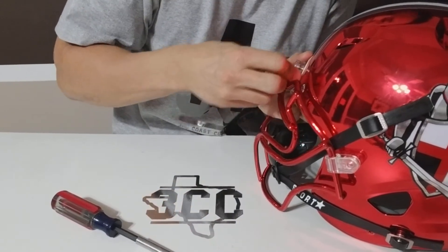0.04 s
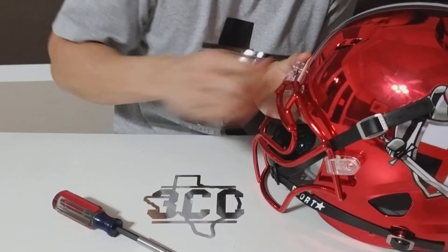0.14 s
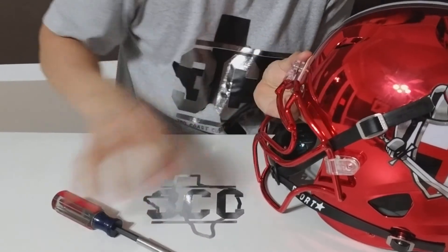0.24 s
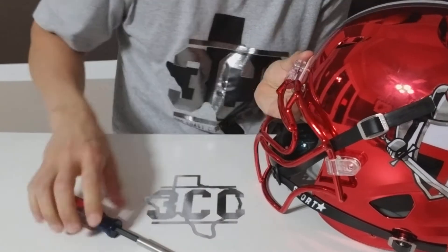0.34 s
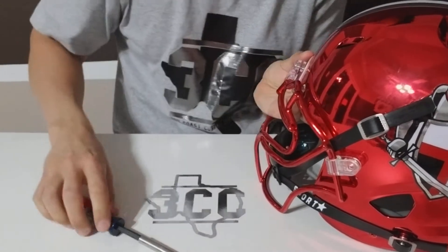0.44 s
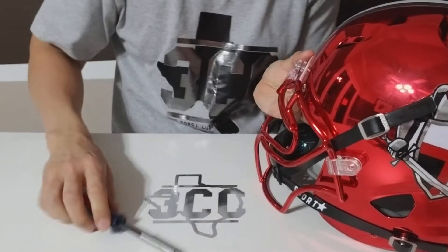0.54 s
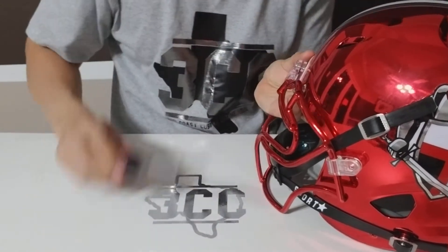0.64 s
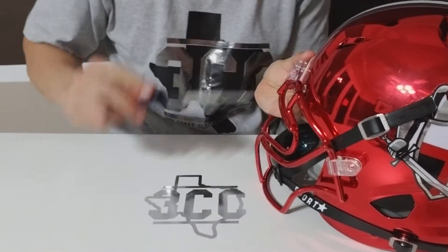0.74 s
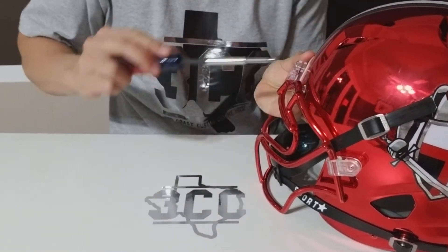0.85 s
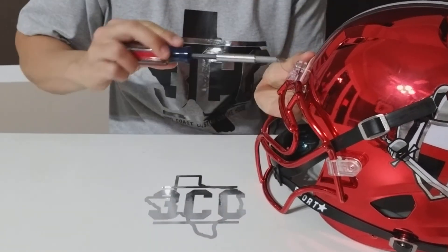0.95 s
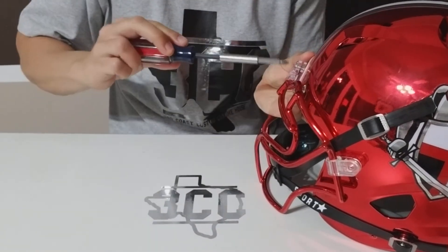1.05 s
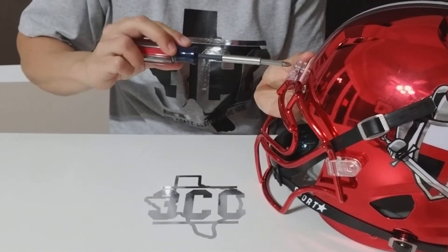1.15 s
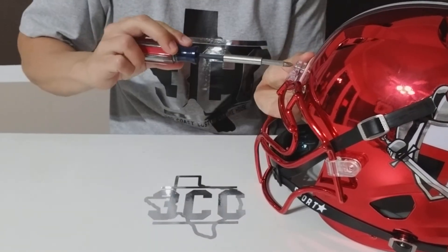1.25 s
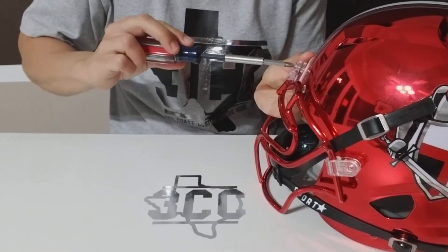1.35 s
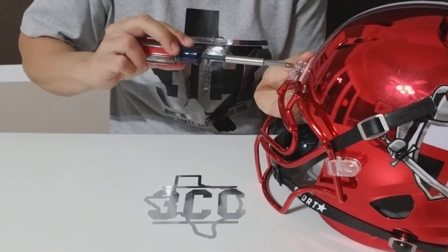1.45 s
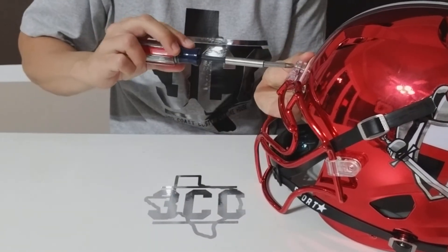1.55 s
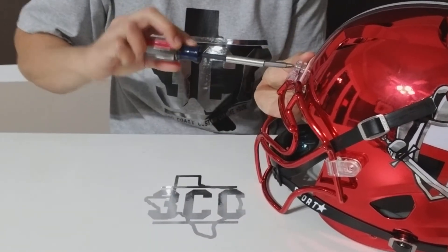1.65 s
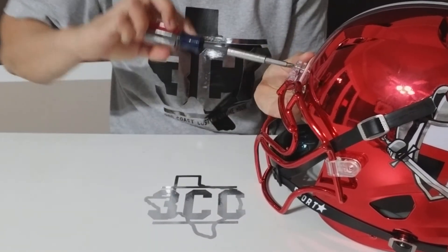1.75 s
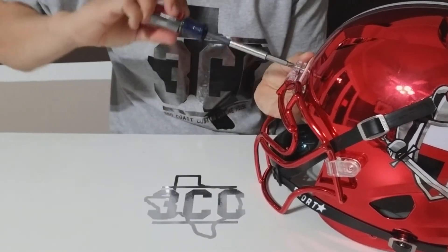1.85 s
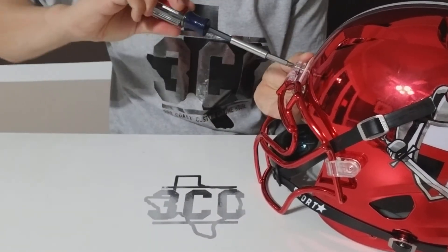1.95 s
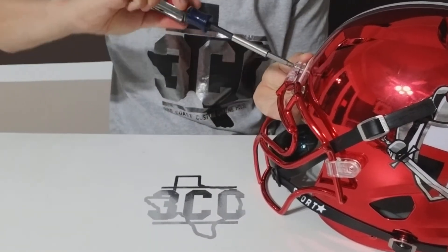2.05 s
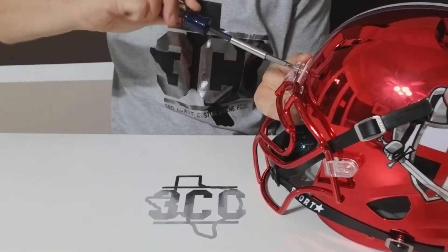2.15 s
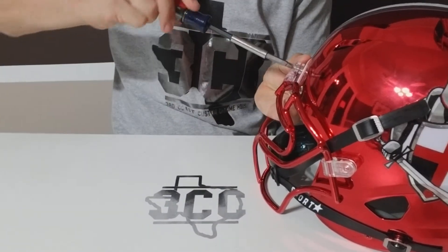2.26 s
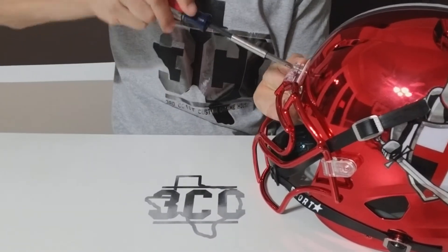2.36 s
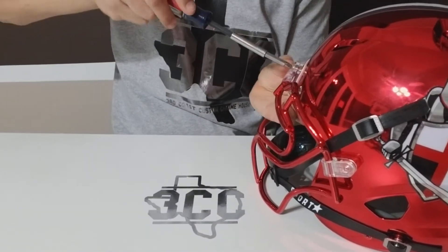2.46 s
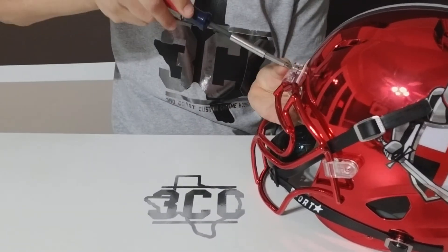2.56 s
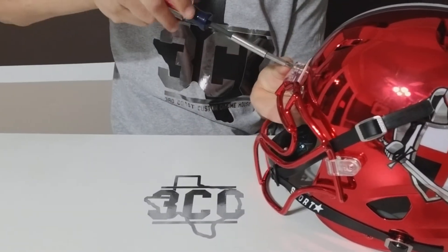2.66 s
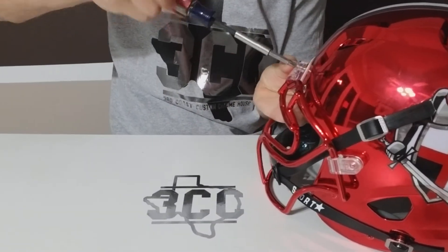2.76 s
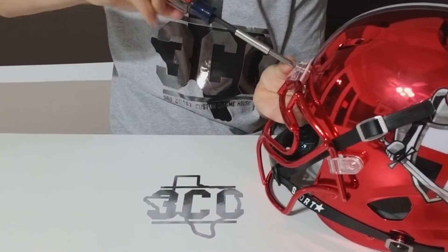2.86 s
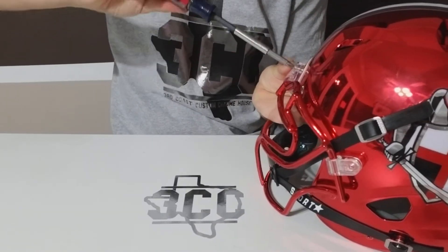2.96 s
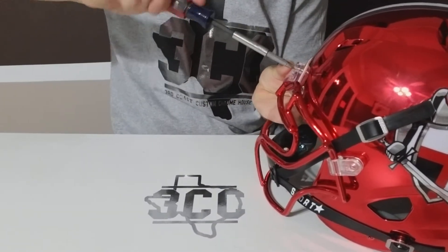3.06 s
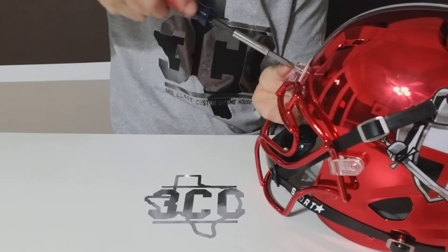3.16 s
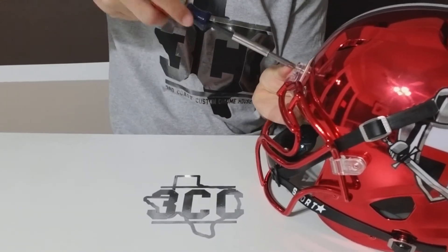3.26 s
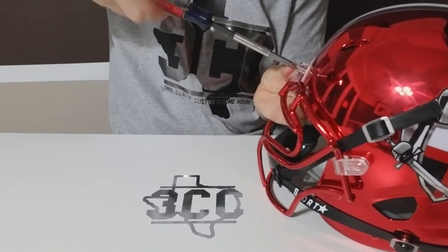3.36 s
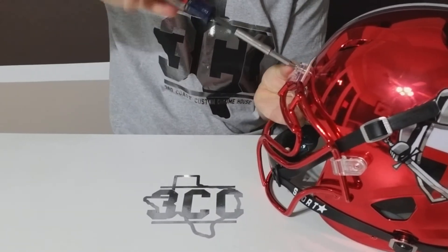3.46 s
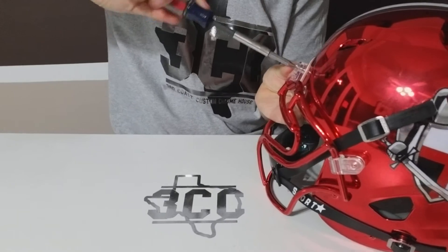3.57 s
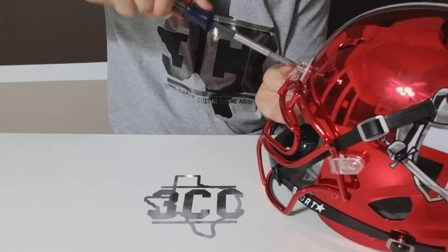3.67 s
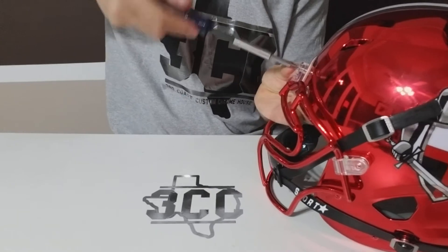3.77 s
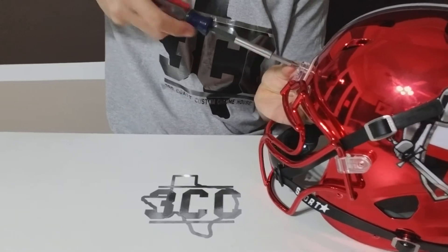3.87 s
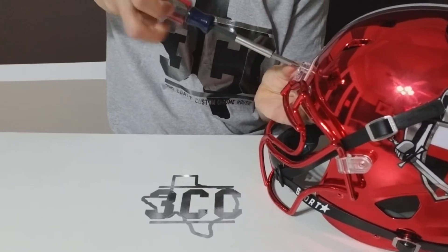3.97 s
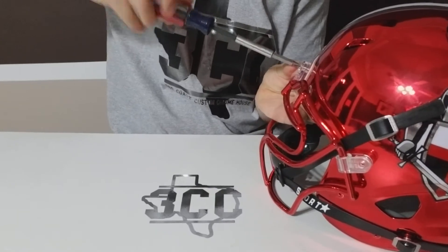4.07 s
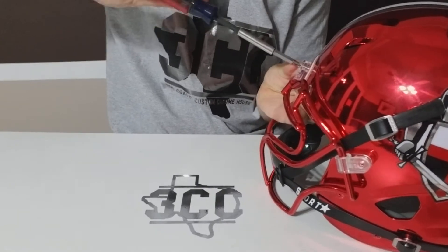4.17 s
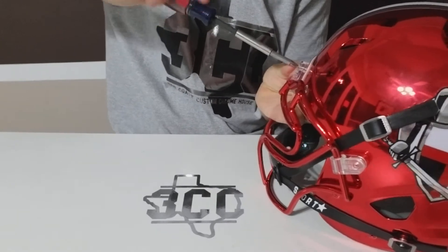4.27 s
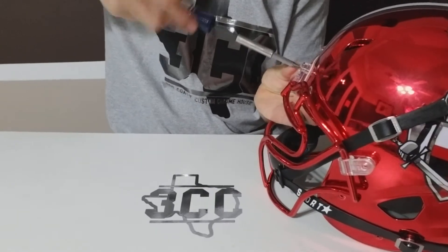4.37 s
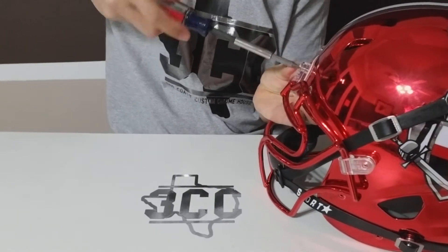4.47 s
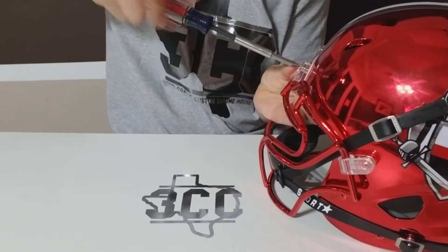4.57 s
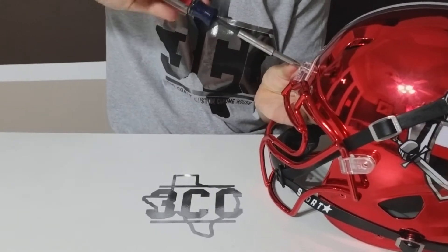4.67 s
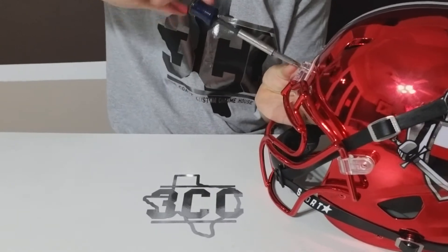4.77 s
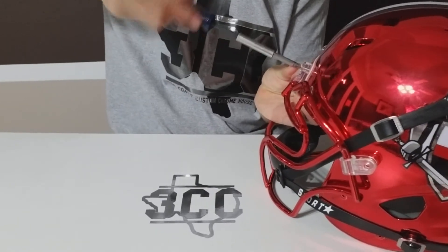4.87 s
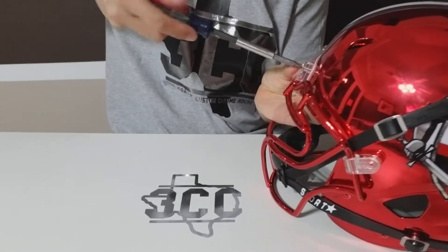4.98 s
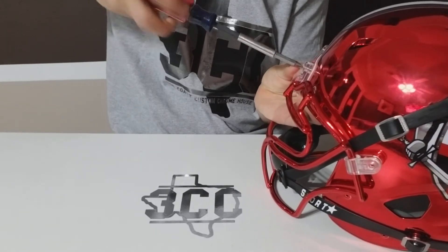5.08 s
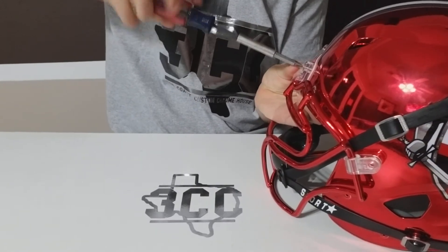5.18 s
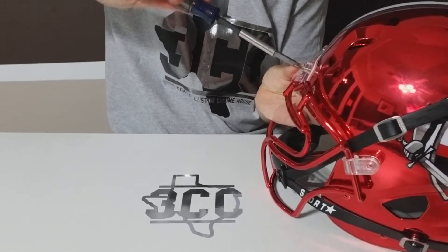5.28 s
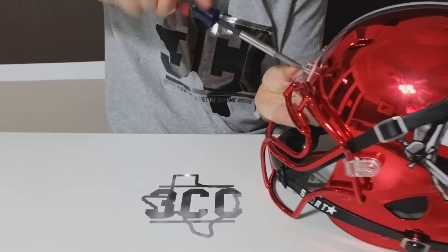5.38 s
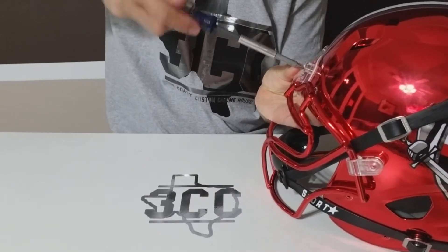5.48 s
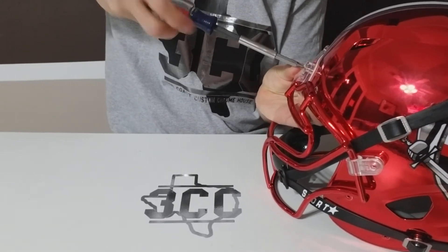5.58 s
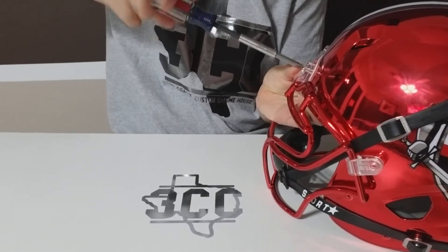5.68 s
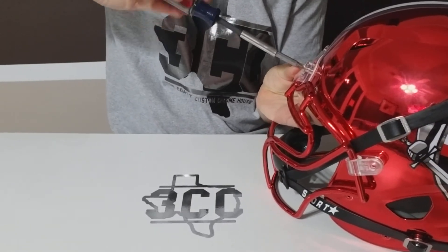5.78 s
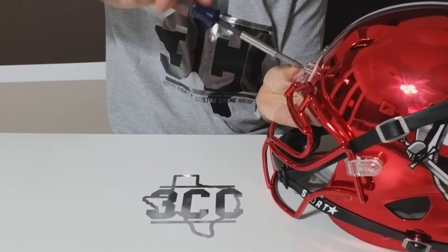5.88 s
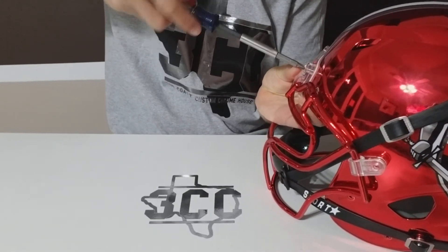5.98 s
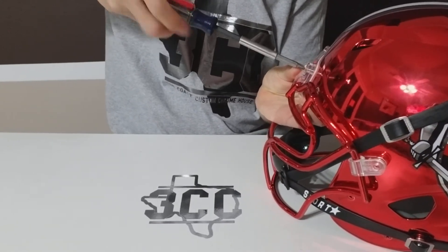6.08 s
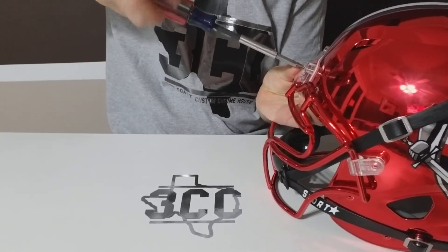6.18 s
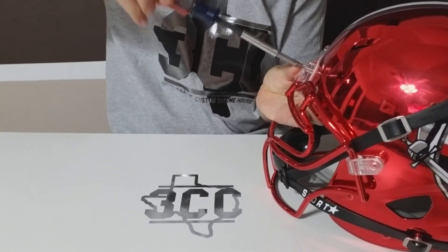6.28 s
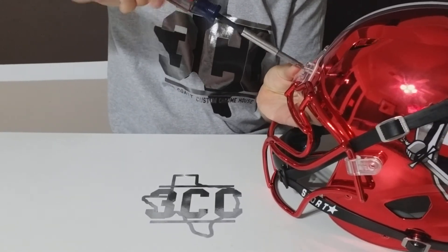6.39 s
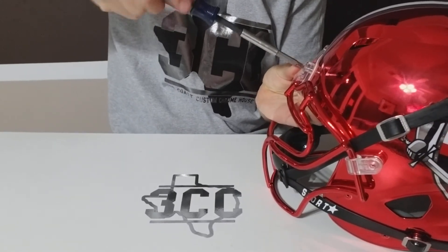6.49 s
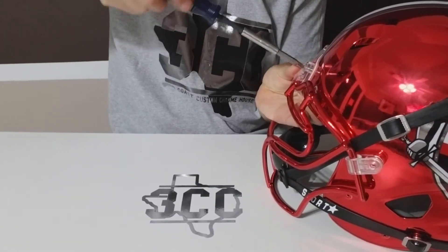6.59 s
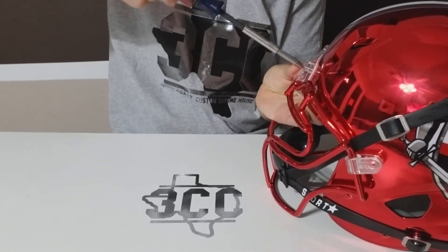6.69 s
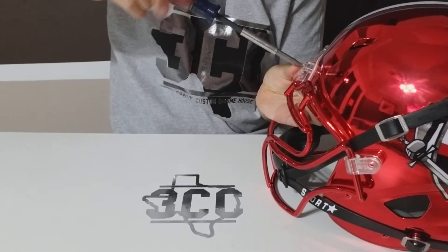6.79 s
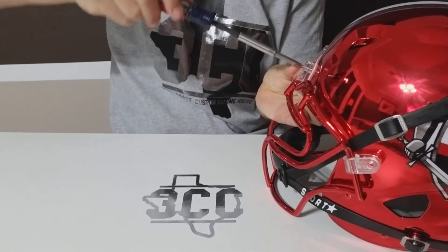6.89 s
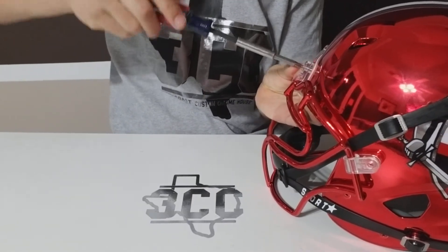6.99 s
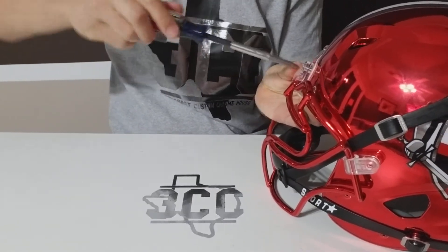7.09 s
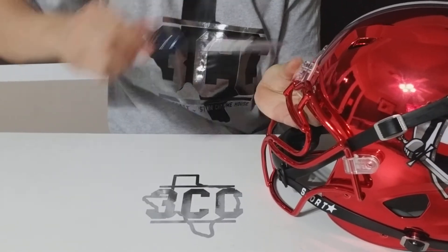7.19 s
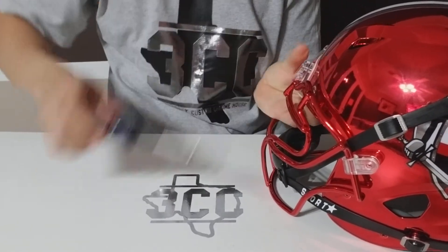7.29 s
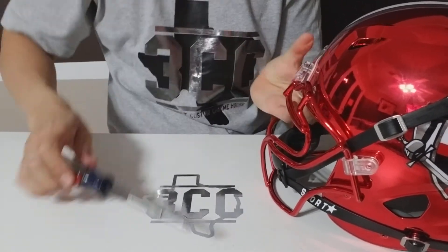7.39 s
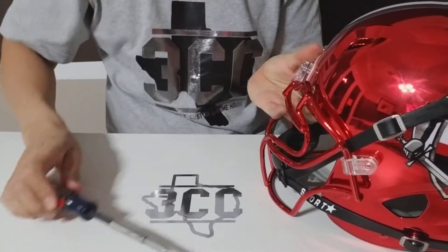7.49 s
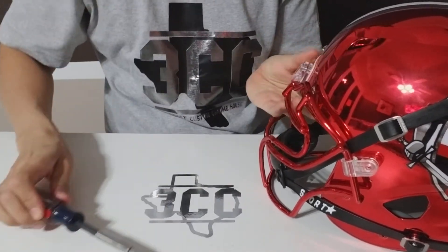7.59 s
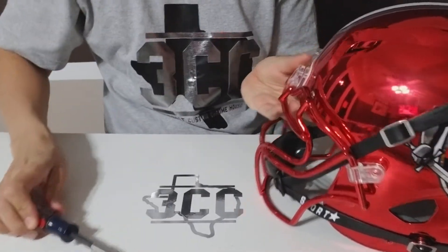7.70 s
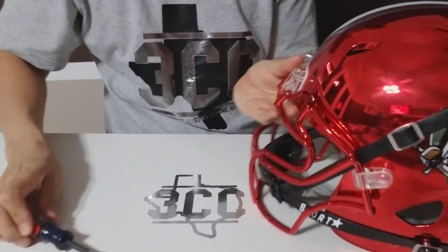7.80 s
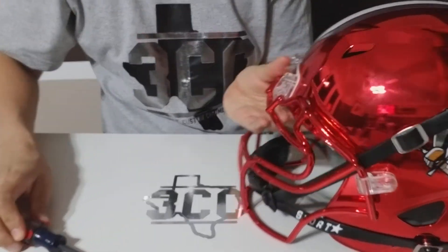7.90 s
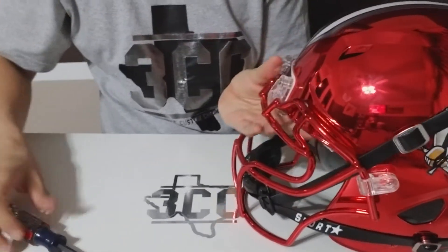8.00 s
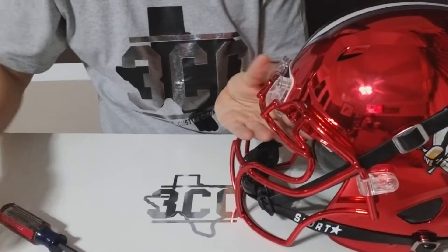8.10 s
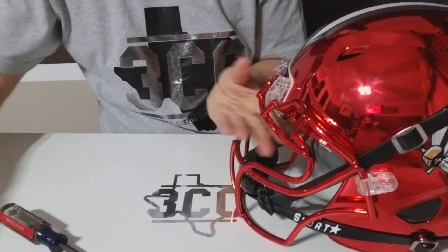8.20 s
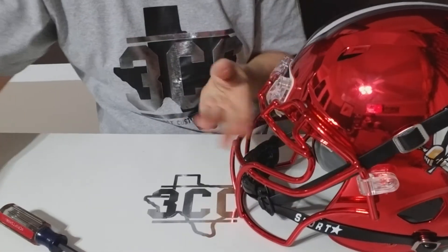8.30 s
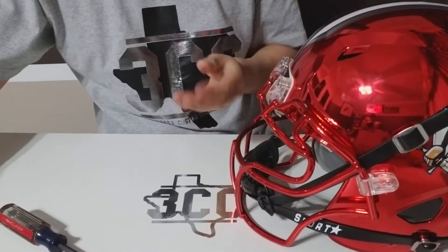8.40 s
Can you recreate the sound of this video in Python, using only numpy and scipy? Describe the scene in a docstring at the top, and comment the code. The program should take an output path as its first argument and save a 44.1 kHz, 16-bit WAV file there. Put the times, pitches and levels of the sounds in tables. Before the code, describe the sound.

Faint scrapes, sharp little snaps and dull helmet knocks come as a screw is turned by hand, before the screwdriver clunks loudly onto a table.

```python
"""First come dull knocks on a hand-held helmet, then a thud and a clack as a screwdriver is picked up.
It turns a screw through a plastic clip on the helmet: at each twist the thread scrapes, the tip snaps
in the screw head and the hollow shell knocks. The loose handle ticks as the tool is moved about.
At the end the tool clatters back onto the table and the plastic gives a short creak.
Two microphones, a hand's length apart, hear it all in a small room with hard walls."""
import sys
import numpy as np
from scipy import signal
from scipy.fft import rfft, irfft, next_fast_len
from scipy.io import wavfile
from scipy.ndimage import uniform_filter1d

SR = 44100
rng = np.random.default_rng(int(sys.argv[2]) if len(sys.argv) > 2 else 0)


def put_to_file(sound):
    """Save the sound as 16-bit audio at rate SR, in the file named by the first command-line argument."""
    columns = np.atleast_2d(sound).T  # one column per channel
    safe = np.clip(columns, -1, 1)
    whole_steps = np.round(safe * 32767)
    wavfile.write(sys.argv[1], SR, whole_steps.astype(np.int16))


N = 372644
TIME = np.arange(N) / SR
HIT = TIME[:2 ** 15]  # the clock for one hit, in seconds


# Twists of the wrist: start t/s, hardest t/s, let-go t/s, rise in effort/dB,
# scrape level/dB, scrape f/Hz, creak level/dB, shell rocking level/dB
TWISTS = [(1.965, 2.05, 2.6, 2.5, -62, 8800, -60.5, -53.5),
          (2.839, 3.029, 3.26, 14.5, -59.5, 10000, -60.5, -49),
          (3.2, 3.408, 3.36, 15.5, -71, 10100, -84, -49.5),
          (3.538, 3.653, 3.864, 24.5, -53.5, 11100, -50.5, -41),
          (4.105, 4.282, 4.57, 11.5, -63, 11000, -70, -43),
          (4.641, 4.788, 5.1, 18.5, -58.5, 12000, -56, -41),
          (5.167, 5.364, 6.03, 5, -67.5, 10100, -67, -59), (5.691, 5.72, 5.86, 24, -59, 13100, -61, -44.5),
          (5.776, 5.853, 6.06, 14.5, -54, 12100, -51.5, -44.5),
          (6.197, 6.212, 6.57, -23, -72.5, 7440, -63, -56),
          (6.29, 6.373, 6.42, -2.5, -70.5, 10200, -68, -48),
          (6.624, 6.725, 6.76, 14.5, -55.5, 13000, -57.5, -51)]
# Tone of the scraping thread: f/Hz, level/dB
SCRAPE_COLOUR = [(2500, 7), (4500, 8.5), (8000, 10.5), (8700, 15), (9400, -11), (10300, 5), (11500, 7.5),
                 (13000, 8.5), (14700, 10), (15700, -29)]
# Tone of the plastic clip: f/Hz, level/dB
CLIP_COLOUR = [(300, -11.5), (700, -30), (1100, -15), (1800, -6), (2200, -4), (2450, 0), (2850, -9.5),
               (3700, -8.5), (4800, -15), (8000, -42)]

def thread_scrape():
    """The thread catches and slips: it scrapes at a pitch set for each twist and creaks in the plastic."""
    catching = judder(rate=160, depth_db=4)
    scrape = colour(catching * slips(rate=1300, spread_db=-3), SCRAPE_COLOUR)
    creak = level(colour(catching * slips(rate=230, spread_db=5), CLIP_COLOUR), 0)

    def scrape_at(hz, width_hz=5300):
        return level(signal.lfilter(*signal.iirpeak(hz, hz / width_hz, fs=SR), scrape), 0)

    track = np.zeros(N)
    for twist in TWISTS:
        start, _, end, _, scrape_db, centre_hz, creak_db, _ = twist
        friction = undb(scrape_db) * scrape_at(centre_hz) + undb(creak_db) * creak
        track += during(start, end) * undb(effort(TIME, twist)) * friction
    start, end = 8.352, 8.4  # the plastic creaks as the helmet is shifted
    add(track, start, stroke(scrape_at(5500), start, end, db=-60) + stroke(creak, start, end, db=-49))
    return track


def effort(t, twist, swell_shape=.49, release_db=60):
    """Effort of a twist in dB: it builds (late, if the shape is below 1), then falls as the hand lets go."""
    start, hardest, end, swell_db = twist[:4]
    to_go = np.interp(t, [start, hardest], [1, 0])
    released = np.interp(t, [hardest, end], [0, 1])
    return -swell_db * to_go ** swell_shape - release_db * released


# The tip jumps in the screw head: t/s, snap level/dB, clip level/dB, snap's low edge f/Hz
SNAPS = [(1.9666, -29.5, -46.5, 12000), (2.016, -52, -48, 9000), (2.0288, -31.5, -40.5, 3000),
         (2.045, -41, -37, 2000), (2.3165, -46.5, -58, 2000), (2.7621, -50, -61, 4000),
         (2.809, -43.5, -46, 2000), (2.927, -60, -52, 2000), (2.9648, -42.5, -55, 8000),
         (3.0632, -53, -66, 5860), (3.0786, -32, -51, 7700), (3.3952, -48.5, -58, 3980),
         (3.616, -37.5, -54, 9000), (3.647, -31.5, -37.5, 2930), (3.6632, -41, -41, 2000),
         (3.8038, -48, -70, 6900), (4.232, -45.5, -53, 3000), (4.2712, -35, -47.5, 6100),
         (4.291, -32.5, -49.5, 6100), (4.298, -43, -55, 7100), (4.34, -38.5, -68, 8000),
         (4.765, -39, -38, 6000), (4.7725, -28, -43.5, 2000), (4.787, -39, -44, 1990),
         (4.829, -46, -56, 3000), (5.3311, -46, -53.5, 4000), (5.3446, -35, -46, 6100),
         (5.3667, -40, -50, 5130), (5.4196, -39.5, -75, 7000), (5.8555, -29.5, -36.5, 4200),
         (5.9628, -41.5, -53, 3020), (6.3964, -41, -71, 5950), (6.424, -44, -54, 6000),
         (6.63, -48, -63, 7750), (6.684, -41, -43, 2980), (6.7243, -29, -53, 10800)]
# Tone of a snap: f/Hz, level/dB
SNAP_COLOUR = [(1500, -13), (3500, -1), (5000, 4), (7200, -1), (8700, 2), (10200, -2.5), (13000, 4.5),
               (14600, -6), (15700, 3.5)]
CLIP_NOTES = [(2350, -3, .07), (2440, 0, .1), (2510, -4, .06), (3790, -10, .04)]

def tip_snaps():
    """Steel slips on steel with a bright snap, and the plastic clip answers lower down."""
    snaps = list(SNAPS)
    for twist in TWISTS:  # extra small snaps follow the effort
        start, hardest, end, _, scrape_db, _, creak_db, _ = twist
        times = moments((start + hardest) / 2, (hardest + end) / 2, count=7)
        sizes_db = effort(times, twist) + 6 + 5 * rng.standard_normal(len(times))
        snaps += [(t, scrape_db + db, creak_db + db, 6500) for t, db in zip(times, sizes_db)]
    times, snap_db, clip_db, edges_hz = np.transpose(snaps)
    track = cracks(times, snap_db, SNAP_COLOUR, t60=.012, rise_s=.00037, edges_hz=edges_hz)
    track += cracks(times, clip_db, CLIP_COLOUR, t60=.021, rise_s=.0029)
    for start, db in zip(times, clip_db):
        add(track, start, peak(ring(CLIP_NOTES, scatter_db=2), db - 10))
    return track


# The shell knocks on hand and table: t/s, boom level/dB, boom f/Hz, hollow level/dB, rattle level/dB
KNOCKS = [(0.01, -38.5, 290, -45, -57), (.047, -38.5, 89, -71, -75), (0.089, -40, 312, -61, -76),
          (0.171, -37, 194, -50, -79.5), (1.321, -46.5, 176, -61.5, -61), (1.439, -50, 119, -62.5, -69),
          (1.609, -40, 184, -71, -57), (1.695, -42, 181, -64, -61.5), (2.091, -39.5, 85, -53, -88),
          (2.313, -50, 352, -51, -50), (2.525, -43.5, 248, -81, -91), (2.734, -37, 186, -63, -67.5),
          (2.77, -29.5, 290, -38.5, -69), (2.784, -35, 78.4, -41.5, -57), (3.201, -39.5, 88, -52, -60),
          (3.468, -41.5, 193, -60, -62), (3.522, -40, 186, -57, -52.5), (3.648, -35.5, 100, -49, -60),
          (3.684, -43, 110, -47.5, -54), (3.776, -33.5, 100, -43, -55.5), (4.164, -36.5, 260, -52, -80),
          (4.331, -36, 192, -58, -79), (4.404, -42, 201, -57.5, -60.5), (4.55, -54, 80, -81, -63),
          (4.682, -38, 82, -66, -58.5), (4.774, -41, 176, -45.5, -46.5), (4.918, -42, 131, -51.5, -61),
          (5.17, -36, 191, -58, -46.5), (5.309, -31, 200, -43, -47.5), (5.479, -42, 182, -71, -56.5),
          (5.682, -37.5, 208, -68, -51), (5.861, -36, 180, -48, -44.5), (6.075, -38.5, 180, -75, -77),
          (6.197, -30.5, 214, -42.5, -42), (6.511, -41.5, 172, -54, -54.5),
          (6.678, -29.5, 224.5, -39.5, -44.5), (6.896, -47, 191, -78, -50.5), (6.966, -38, 302, -59, -46),
          (7.341, -41, 188.4, -51, -84), (8.213, -47.5, 108, -89, -91), (8.379, -61, 202, -59.5, -46)]
# Notes the shell rings with: f/Hz, level/dB, ring time/s
SHELL_NOTES = [(75, -4.5, .15), (87, -4.5, 0.18), (102.7, 0.5, .12), (172, -3, 0.11), (196.6, 1.5, 0.055),
               (262, -1.5, 0.073), (308.7, 6, 0.033), (352, -6.5, 0.035), (440, -6, 0.079)]
# Tones of the hollow shell, of loose parts rattling and of a rubbing hand: f/Hz, level/dB
HOLLOW_COLOUR = [(40, -47.5), (150, -36), (330, -2), (470, 3.5), (560, -7.5), (700, -7.5), (800, -7),
                 (1000, -13.5), (1300, -29.5), (3000, -39), (9000, -59.5)]
RATTLE_COLOUR = [(300, -22), (600, 7), (1000, 7.5), (1250, 5), (1600, 8), (2100, 2.5), (2700, -2.5),
                 (3400, -13.5), (5500, -31), (12000, -43)]
GRIP_COLOUR = [(30, -42.5), (65, -2), (110, 2), (145, -1), (190, -1.5), (260, -3.5), (330, -1),
               (450, -17.5), (600, -24), (1000, -22), (2000, -30), (5000, -38.5)]

def helmet_knocks():
    """Each knock makes the hollow shell boom and shakes its fittings; the hand rubs in between."""
    bumps, rub_gain = rocking()
    knocks = KNOCKS + bumps
    times, _, _, hollow_db, rattle_db = np.transpose(knocks)
    track = cracks(times, hollow_db, HOLLOW_COLOUR, t60=.055, rise_s=.00086)
    track += cracks(times, rattle_db, RATTLE_COLOUR, t60=.051, rise_s=.003)
    cushion = (1 - np.exp(-HIT / .0024)) * fade(.25)  # the hand softens and damps each blow
    for start, boom_db, centre_hz, _, _ in knocks:
        boom = ring(SHELL_NOTES, scatter_db=2.5, centre_hz=centre_hz, octaves=.95)
        add(track, start, peak(cushion * boom, boom_db))
    rub = level(colour(slips(rate=250, spread_db=2), GRIP_COLOUR), 0)
    return track + rub_gain * rub


def rocking(effort_share=.49, bump_hz=100):
    """Twists rock the helmet: gives small bumps (rows like KNOCKS) and the volume of the hand's rub."""
    bumps = []
    rub_gain = undb(-66.5) * during(1.3, 7.45)  # the hand rests on the shell
    for twist in TWISTS:
        start, _, end, *_, shell_db = twist
        times = moments(start, end, count=5)
        size, pitch = rng.standard_normal((2, len(times)))
        db = shell_db + effort_share * effort(times, twist) + 4 + 2.5 * size
        bumps += zip(times, db, bump_hz * 2 ** (pitch / 2), db - 9.5, db - 18)
        rub_gain += during(start, end) * undb(shell_db + effort_share * effort(TIME, twist) - 7)
    return bumps, rub_gain


# Hard clacks on the table: t/s, crack level/dB, ring level/dB, first bounce level/dB
CLACKS = [(.501, -29.5, -65.5, -63), (7.678, -14, -27, -23.5), (7.687, -13.5, -26, -25.5),
          (7.711, -21, -27, -28), (7.838, -31.5, -42, -64)]
# Tone of a clack: f/Hz, level/dB
CLACK_COLOUR = [(200, -29), (550, -2.5), (900, -1), (1500, 4.5), (2200, 5), (3300, 0), (4000, -2),
                (4700, -14.5), (5800, -22.5), (7400, -23.5), (9500, -31), (15500, -32)]
# Notes of tool and table ringing together: f/Hz, level/dB, ring time/s
TOOL_NOTES = [(615, -4, .2), (986, -10, .15), (1058, -6, .15), (1203, -7, .2), (1312, -6, .18),
              (1443, -5, .14), (1480, -6, .14), (1575, -4, .14), (1637, -9, .12), (1798, -7, .14),
              (1820, -7, .18), (2090, 2, .15), (2165, -4, .12), (2272, -8, .12), (2374, -9, .1),
              (2774, -2, .1), (2923, -11, .1), (3173, -3, .11), (3400, -9, .07), (3946, -13, .07)]

def tool_clatter():
    """The tool bounces on the table: each contact cracks and sets both ringing."""
    contacts = []
    for start, crack_db, ring_db, bounce_db in CLACKS:
        contacts.append((start, crack_db, ring_db))
        contacts += [(t, db, db + ring_db - crack_db) for t, db in bounces(start, bounce_db)]
    times, crack_db, ring_db = np.transpose(contacts)
    track = cracks(times, crack_db, CLACK_COLOUR, t60=.024, rise_s=.0005)
    for start, db in zip(times, ring_db):
        add(track, start, peak(ring(TOOL_NOTES, scatter_db=1.5), db))
    return track


def bounces(start, db, count=3, gap_s=.008, loss_db=3):
    """Quick, ever weaker contacts after a clack: t/s, level/dB."""
    turn = np.arange(count)
    jitter = (rng.random(count) - .5) / 2
    return zip(start + gap_s * (turn + 1 + jitter), db - loss_db * turn)


# Hand and handle thud on the table: t/s, level/dB, centre f/Hz, spread/octaves, rattle level/dB
THUDS = [(0.39, -30, 440, 0.54, -46.5), (.413, -29.5, 440, 0.21, -61), (7.565, -24.5, 254, 1.6, -48),
         (7.679, -20.5, 211, 0.87, -44), (7.819, -16, 250, 1.46, -26), (7.835, -30.5, 123, 0.34, -34.5),
         (7.899, -22, 302, .09, -35.5), (7.965, -46, 308, 1.2, -42)]
# Hand and tool drag over the table: start t/s, end t/s, rumble level/dB, scuff level/dB
DRAGS = [(0, 0.111, -52, -66.5), (0.377, 0.511, -45.5, -47.5), (7.537, 7.723, -40.5, -54.5),
         (7.897, 7.927, -33.5, -43.5), (7.98, 8.034, -54, -75)]
# Notes the table top rings with: f/Hz, level/dB, ring time/s
TABLE_NOTES = [(82, -2, .16), (123, -1, .14), (198, -5, .11), (250, -3, .08), (304, -1, .16),
               (375, -6, .11), (431, -4, .15), (470, -6, .13), (533, -9, .12), (618, -6, .16),
               (820, -9, .14), (985, -7, .1)]

def table_thuds():
    """Soft blows and drags wake only the low notes of the table top and shake what lies on it."""
    times, *_, rattle_db = np.transpose(THUDS)
    track = cracks(times, rattle_db, RATTLE_COLOUR, t60=.22, rise_s=.0034)
    hand_damping = fade(.23)
    for start, thud_db, centre_hz, octaves, _ in THUDS:
        boom = ring(TABLE_NOTES, scatter_db=1.3, centre_hz=centre_hz, octaves=octaves)
        add(track, start, peak(hand_damping * boom, thud_db))
    friction = slips(rate=590, spread_db=0)
    rumble = signal.fftconvolve(friction, ring(TABLE_NOTES, scatter_db=.21, centre_hz=290, octaves=.99))
    scuff = colour(friction, RATTLE_COLOUR)
    for start, end, rumble_db, scuff_db in DRAGS:
        add(track, start, stroke(rumble, start, end, rumble_db) + stroke(scuff, start, end, scuff_db))
    return track


# Ticks of the handle: t/s, level/dB
TICKS = [(0.641, -60), (0.6718, -51), (.6864, -72), (.7622, -63.5), (0.8128, -62), (.87, -62.5),
         (0.918, -62), (1.0116, -63.5), (1.1312, -68.5), (1.314, -67.5), (6.974, -61.5), (7.11, -58.5),
         (7.122, -60), (7.198, -70.5), (7.3588, -64.5)]
# Tone of a tick: f/Hz, level/dB
HANDLE_COLOUR = [(1500, -36.5), (2450, -5), (3300, -26.5), (4000, -2), (4500, -0.5), (5400, -3.5),
                 (7000, -0.5), (8000, -6), (9500, -17), (14000, -12.5)]
# Notes the handle rings with: f/Hz, level/dB, ring time/s
HANDLE_NOTES = [(2480, -3, .03), (4430, -1, .025), (4580, 0, .03)]

def handle_ticks():
    """The loose handle taps lightly on its shaft as the screwdriver is moved about."""
    track = cracks(*np.transpose(TICKS), HANDLE_COLOUR, t60=.0064, rise_s=.00022)
    for start, db in TICKS:
        add(track, start, peak(ring(HANDLE_NOTES, scatter_db=3), db - 7))
    return track


# How long the walls echo at each pitch: f/Hz, ring time/s
ECHO_TIMES = [(80, 0.38), (300, 0.35), (1200, 0.34), (2500, 0.29), (5000, 0.24), (9000, 0.3), (15000, 0.22)]

def room_echo(early_db, early_t60, build_s):
    """Quick echoes from the table top, then a tail from the walls whose high notes die sooner."""
    spectrum = rfft(diffuse(len(HIT)))
    hz = np.arange(spectrum.shape[1]) * SR / len(HIT)
    tail = 0
    for centre, t60 in ECHO_TIMES:
        band = along([(f, float(f == centre)) for f, _ in ECHO_TIMES], hz)
        tail = tail + irfft(spectrum * band) * fade(t60)
    tail *= 1 - np.exp(-HIT / build_s)
    early = diffuse(len(HIT)) * fade(early_t60) * (HIT > .0005)
    return (level(tail, 0) + level(early, early_db)) / np.sqrt(len(HIT))


# Tone of the quiet room: f/Hz, level/dB
AIR_COLOUR = [(15, -39.5), (25, -2), (74, 2), (111, 7), (190, -5), (242, -16), (309, -15), (591, -21.5),
              (840, -22), (2480, -29), (3620, -31), (14800, -32), (16000, -48)]

def room_noise():
    """A faint rumble and hiss from all around."""
    return level(colour(diffuse(N), AIR_COLOUR), -63.5)


def ring(notes, scatter_db, centre_hz=1000., octaves=np.inf):
    """A struck object's fading notes; each blow lands elsewhere and favours those near centre_hz."""
    out = 0
    for (hz, db, t60), (size, detune, sign) in zip(notes, rng.standard_normal((len(notes), 3))):
        nearness = np.exp(-.5 * (np.log2(hz / centre_hz) / octaves) ** 2)
        wave = np.sign(sign) * np.sin(2 * np.pi * hz * (1 + detune / 500) * HIT)
        out = out + undb(db + scatter_db * size) * nearness * fade(t60) * wave
    return out


def cracks(times, levels_db, tone, t60, rise_s, edges_hz=None, size=4096):
    """Each contact wakes a crowd of short-lived notes: a burst of noise, cut below its edge if given."""
    response = colour(np.eye(1, size)[0], tone)
    envelope = (fade(t60) * (1 - np.exp(-HIT / rise_s)))[:size]
    track = np.zeros(N)
    for k, noise in enumerate(rng.standard_normal((len(times), size))):
        burst = signal.fftconvolve(noise * envelope, response)
        if edges_hz is not None:
            burst = signal.lfilter(*signal.butter(2, edges_hz[k], "highpass", fs=SR), burst)
        add(track, times[k], peak(burst, levels_db[k]))
    return track


def slips(rate, spread_db):
    """Surfaces stick and slip: tiny random clicks, about `rate` a second."""
    sizes = undb(spread_db * np.minimum(rng.exponential(size=N), 3))
    return (rng.random(N) < rate / SR) * sizes * rng.choice([-1, 1], N)


def judder(rate, depth_db):
    """A volume that jumps as the thread catches and lets go."""
    times = np.cumsum(rng.exponential(1 / rate, N // 100))
    return undb(depth_db * np.interp(TIME, times, rng.standard_normal(len(times))))


def stroke(friction, start, end, db):
    """One rub cut from a friction sound, eased in and out."""
    x = friction[int(start * SR):int(end * SR)]
    return level(x * signal.windows.tukey(len(x), .25), db)


def diffuse(size, mic_gap_m=.2):
    """Noise from all sides: the lows are alike at both microphones, the highs unrelated."""
    hz = np.arange(size // 2 + 1) * SR / size
    likeness = np.sinc(2 * mic_gap_m / 343 * hz)  # sound travels 343 m/s
    mid, side = rfft(rng.standard_normal((2, size)))
    mid, side = mid * np.sqrt(1 + likeness), side * np.sqrt(1 - likeness)
    return irfft(np.array([mid + side, mid - side]), size) / np.sqrt(2)


def place(x, walls, wet_db, pan_db, lag_ms):
    """The direct sound, reaching the left microphone lag_ms sooner, plus the echo at wet_db."""
    size = next_fast_len(N + len(HIT), real=True)
    hz = np.arange(size // 2 + 1) * SR / size
    lead = np.exp(2j * np.pi * hz * lag_ms / 1000)
    direct = np.array([lead * undb(pan_db / 2), np.ones(len(hz)) * undb(-pan_db / 2)])
    echo = undb(wet_db) * rfft(walls, size)
    return irfft(rfft(x, size) * (direct + echo), size)[:, :N]


def colour(x, tone):
    """Turn each pitch up or down by a table of f/Hz, level/dB."""
    size = next_fast_len(x.shape[-1] + len(HIT), real=True) * 2
    hz = np.arange(size // 2 + 1) * SR / size
    cepstrum = irfft(np.log(undb(along(tone, hz))))
    cepstrum[1:size // 2] *= 2  # folded forward, so nothing rings before its hit
    cepstrum[size // 2 + 1:] = 0
    return irfft(rfft(x, size) * np.exp(rfft(cepstrum)))[..., :x.shape[-1]]


def along(points, hz):
    """Read between rows of f/Hz, value, with octaves evenly spaced."""
    f, value = np.transpose(points)
    return np.interp(np.log(np.maximum(hz, 1)), np.log(f), value)


def during(start, end):
    """Softly switch on at start and off at end."""
    return np.interp(TIME, [start, start + .01, end, end + .03], [0, 1, 1, 0])


def moments(start, end, count):
    """Unevenly spaced times between start and end."""
    return start + (end - start) * (np.arange(count) + rng.random(count)) / count


def fade(t60):
    """Die away by 60 dB in t60 seconds, the ring time."""
    return np.exp(-np.log(1000) * HIT / t60)


def undb(db):
    """Turn decibels into a multiplier."""
    return 10 ** (np.asarray(db) / 20)


def level(x, db):
    """Set the average (rms) level."""
    return x * undb(db) / np.sqrt(np.mean(x ** 2))


def peak(x, db):
    """Set the level of the loudest three milliseconds."""
    return x * undb(db) / np.sqrt(uniform_filter1d(x ** 2, 128, mode="constant").max())


def add(track, t, x):
    """Mix a sound into a track at t seconds."""
    start = int(np.clip(t * SR, 0, N - 1))
    track[start:start + len(x)] += x[:N - start]


def scene():
    """The helmet is a little to the left, the table about straight ahead, over faint room noise."""
    walls = room_echo(early_db=-2, early_t60=.04, build_s=.009)
    out = place(tip_snaps(), walls, wet_db=-7, pan_db=2, lag_ms=.11)
    out += place(thread_scrape(), walls, wet_db=0, pan_db=3.5, lag_ms=.16)
    out += place(helmet_knocks(), walls, wet_db=-1, pan_db=4, lag_ms=.14)
    out += place(handle_ticks(), walls, wet_db=5, pan_db=6, lag_ms=0)
    out += place(tool_clatter(), walls, wet_db=-1, pan_db=-.7, lag_ms=0)
    out += place(table_thuds(), walls, wet_db=-5, pan_db=1.5, lag_ms=.18)
    return out + room_noise()


# How much louder the left microphone is than the right: f/Hz, level/dB
MIC_BALANCE = [(2500, 0), (4000, 2), (8000, 1), (10500, -0.5), (13000, 2.5)]

def record(dry):
    """The two microphones differ in the highs; the deepest bass and the very top are cut away."""
    heard = [colour(x, [(hz, side * db / 2) for hz, db in MIC_BALANCE]) for x, side in zip(dry, (1, -1))]
    bass_cut = signal.butter(3, 48, "highpass", fs=SR, output="sos")
    top_cut = signal.ellip(10, .2, 70, 16100, fs=SR, output="sos")
    return signal.sosfilt(top_cut, signal.sosfilt(bass_cut, np.array(heard)))


dry = scene()
out = record(dry)
put_to_file(out)
```